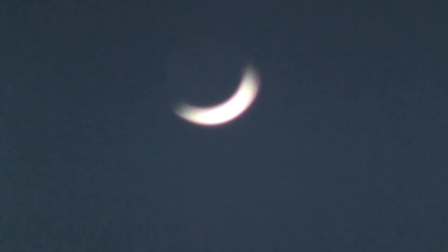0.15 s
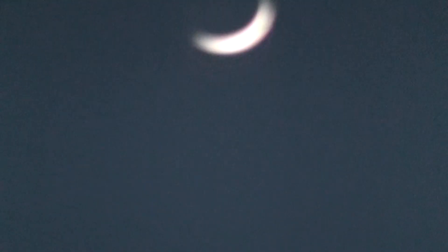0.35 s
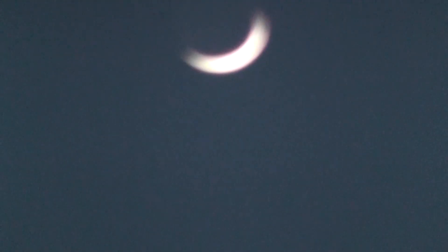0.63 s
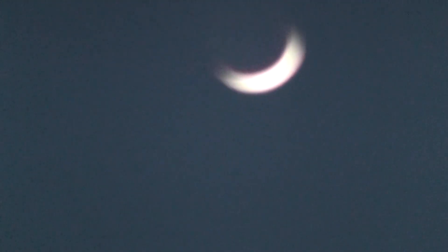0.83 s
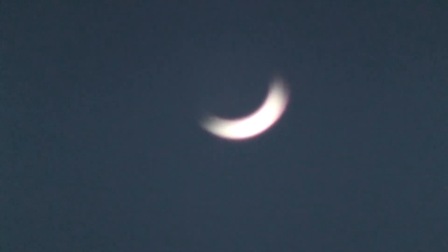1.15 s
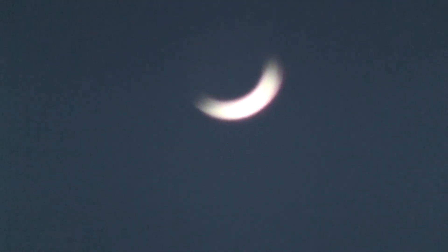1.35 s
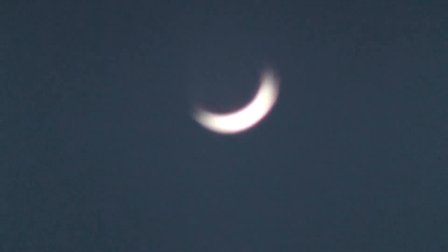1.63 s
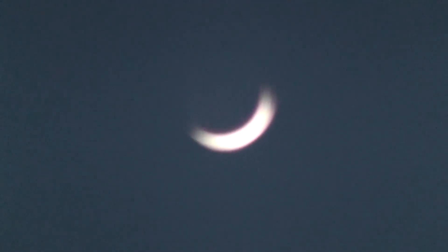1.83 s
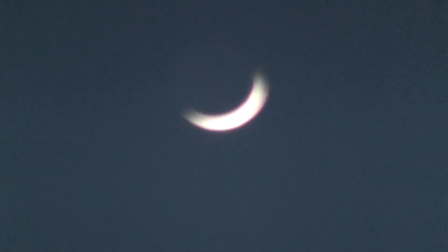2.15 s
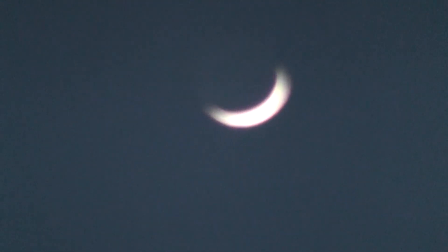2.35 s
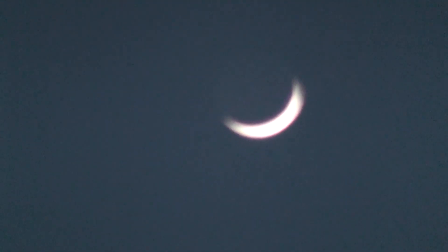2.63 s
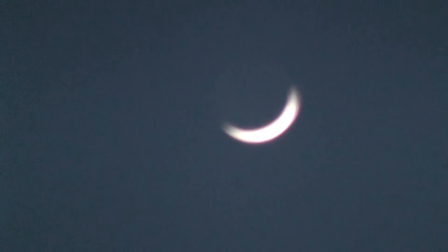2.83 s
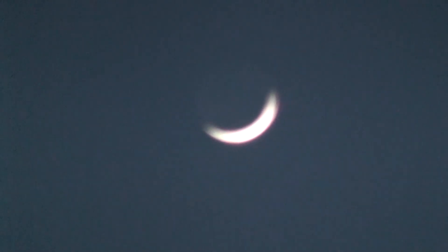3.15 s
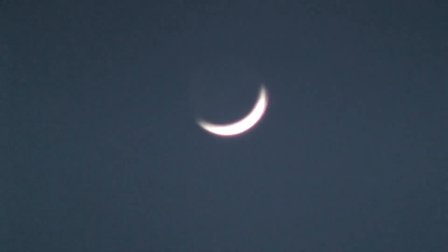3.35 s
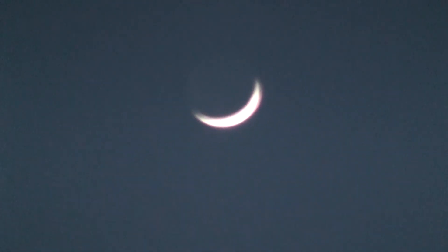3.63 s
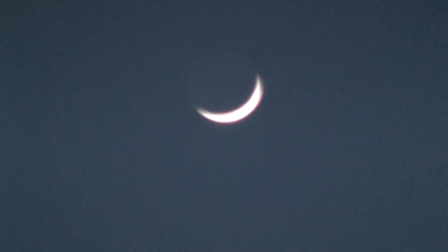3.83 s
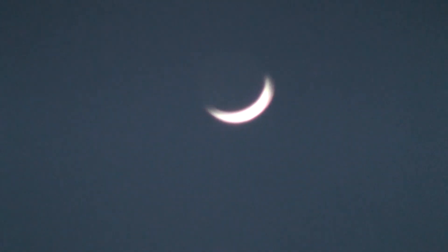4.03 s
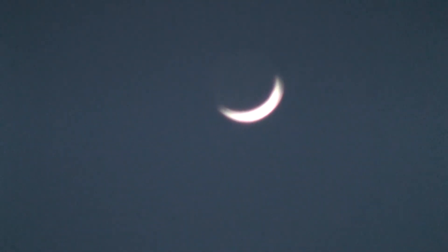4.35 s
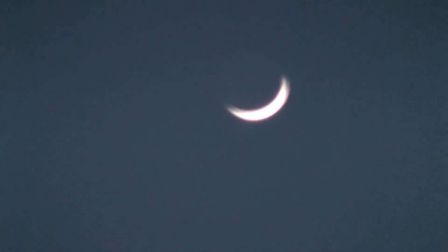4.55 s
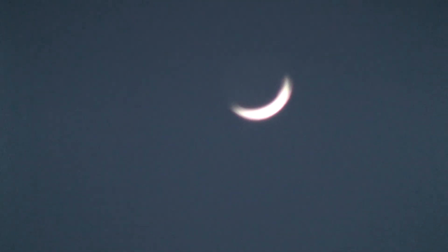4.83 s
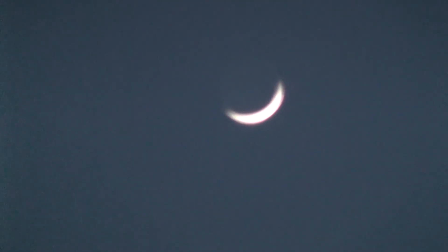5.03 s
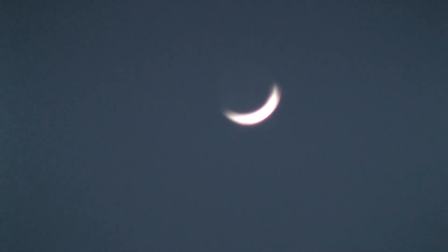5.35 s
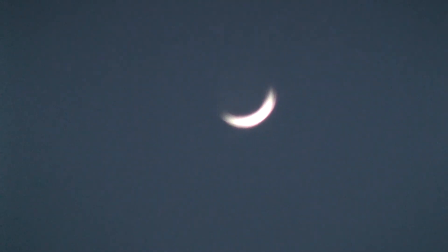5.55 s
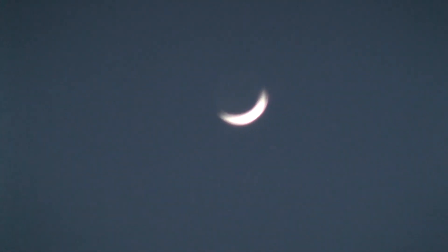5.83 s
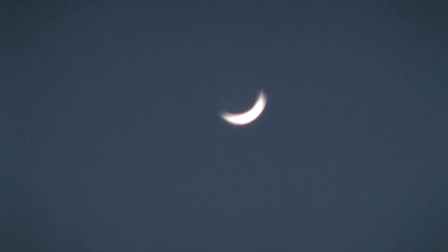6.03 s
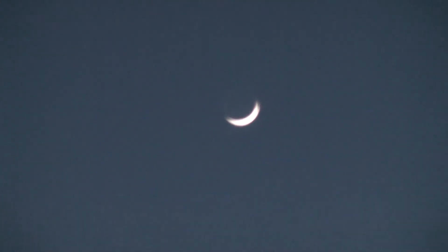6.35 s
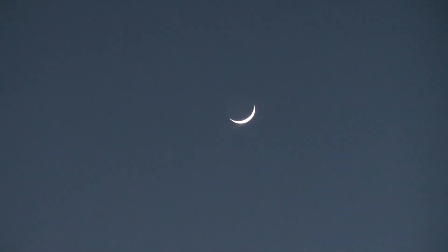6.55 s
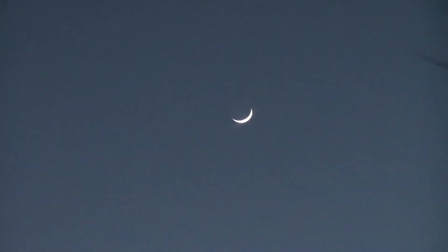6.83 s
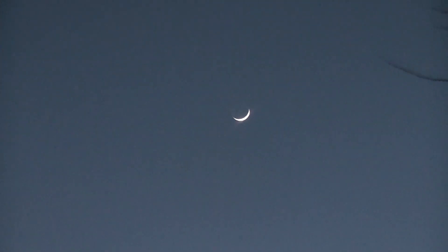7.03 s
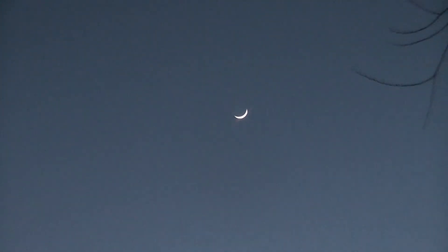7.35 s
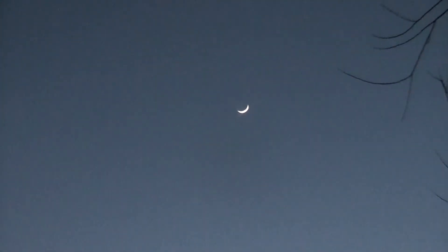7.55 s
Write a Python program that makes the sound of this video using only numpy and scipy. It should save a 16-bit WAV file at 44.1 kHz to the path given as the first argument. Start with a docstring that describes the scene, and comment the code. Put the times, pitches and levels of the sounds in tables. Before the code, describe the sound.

One blackbird, slightly left and in front of a stereo microphone, whistles rich falling notes, then single short chirped whistles with pauses, then a raspy buzz and squeaky high chips. Two last tiny chips come after a gap. The garden adds diffuse reverberation. Behind are low steady traffic, soft hiss, a blurred distant bird and very faint ticking.

```python
"""Slurred whistles are heard first: a blackbird sings one strophe, then arched and hooked notes, a buzz, a high twitter.
Each whistle is a gliding sine whose loudness depends on pitch, with weak overtones and noisy rasp added.
Walls and trees answer as decaying noise echoes with a gradual build-up.
Behind it, filtered noise makes distant traffic, a hiss, faint ticking and, late on, a lens zoom motor.
A far bird, made of unsteady sines, arrives blurred by echoes."""
import sys
import numpy as np
from scipy import signal
from scipy.fft import rfft, irfft, next_fast_len
from scipy.io import wavfile
from scipy.ndimage import map_coordinates

SR = 44100
rng = np.random.default_rng(int(sys.argv[2]) if len(sys.argv) > 2 else 0)


def store_pcm(level_fs):
    """Save levels as 16-bit WAV."""
    pcm = np.round(np.clip(level_fs, -1, 1) * 32767).astype(np.int16)
    wavfile.write(sys.argv[1], SR, np.atleast_2d(pcm).T)


N = 339129  # length in samples

# Overtones added in the windpipe: (harmonic number, level/dB before colouring)
OVERTONES = [(2, -54.5), (3, -70), (4, -70.5)]
# Colour the windpipe gives the overtones: (f/Hz, gain/dB)
WINDPIPE_COLOUR = [(4000, -12), (5000, 1.5), (5700, -5), (6400, -1), (7500, 5), (9200, -10.5), (10600, 1.5),
                   (12500, -8.5), (15000, -6)]


def blackbird(knee_db=-39, least_rasp_db=-36):
    """Nonlinear source and filter: both voices share one windpipe, which adds overtones; noise modulation rasps."""
    song, rough = slurs() + arches() + hooks() + chips() + buzzes()
    wave = signal.hilbert(song, next_fast_len(N))[:N]
    loudness, phase = np.abs(wave), np.angle(wave)

    # The overtones level off early, so soft notes are reedy and loud ones pure.
    drive = loudness / (loudness + amp(knee_db)) * amp(2.9 * wobble(120, N))
    overtones = drive * sum(amp(db) * np.cos(round(k) * phase) for k, db in OVERTONES)
    overtones = filtered(overtones, lambda hz: amp(along(WINDPIPE_COLOUR, hz)))

    rasp_colour = [(300, 1.5), (2000, -10.5), (4000, -15.5), (6000, -29.5), (9000, -26), (13000, -36.5)]
    rasp = unit(filtered(rng.standard_normal(N), lambda hz: amp(along(rasp_colour, hz))))
    return song + (rough + amp(least_rasp_db) * song) * rasp + overtones


# Slurred whistles; a high bend keeps the pitch up until late in the fall. Levels precede the pitch gain:
# (t/s, attack/s, rise/s, fall/s, hold/s, start f/Hz, top f/Hz, end f/Hz, bend,
#  level/dB, fade/dB, upper voice level/dB re main, rasp level/dB re tone)
SLURS = [ (.002, 0.0037, 0.02, 0.052, 0.0027, 2770, 3120, 2700, 1.2, -50, 4, -25, -21),
         (0.152, 0.0034, .02, 0.035, 0.013, 2870, 3080, 2150, 2.7, -26, -3.5, -9, -11.5),
         (0.225, 0.0078, 0.0094, 0.058, 0.03, 3117, 3220, 2137, 1.5, -31, -1.5, -27, -10),
         (0.702, 0.025, 0.036, 0.088, 0.0036, 2776, 2818, 1780, 1.4, -26, -6, -13, -16),
         (1.164, .007, 0.016, .092, 0.0021, 2690, 2720, 1790, 1.8, -26.5, -3.5, -13, -20.5),
         (4.549, 0.0058, .02, 0.043, 0.031, 2830, 2870, 2110, 7, -28, -3.5, -23, -19),
         (4.765, .014, 0.034, .053, 0.0024, 2875, 2920, 2260, 3.3, -23, -6.5, -40, -31), ]
SPLIT_RATIO, SPLIT_S = 1.5, 0.027  # upper voice a fifth above; time it and the rasp take to grow


def slurs(release_s=0.0045):
    """Two-voice phonation: whistles split past their top and roughen as they slide down."""
    out = 0
    for (s, attack, rise, fall, hold, start, top, end, bend,
         db, fade_db, upper_db, rasp_db) in SLURS:
        t, _ = clock(rise + fall + hold)
        falling = np.clip((t - rise) / fall, 0, 1)
        hz = arc(t, rise, start, top, end, falling ** bend)
        gain = amp(db + fade_db * falling ** 2) * envelope(t, attack, release_s)
        split = np.clip((t - rise) / SPLIT_S, 0, 1) ** 2
        out = out + sung(s, hz, gain, split * amp(rasp_db))
        out = out + sung(s, SPLIT_RATIO * hz, gain * split * amp(upper_db))
    return out


# Quick arched notes: (t/s, top f/Hz, length/s, level/dB before the pitch gain)
ARCHES = [(1.610, 3258, .058, -26.5), (2.092, 3295, 0.05, -25), (2.442, 3153, .059, -26),
          (2.779, 3266, 0.056, -27)]


def arches(top_at=.61, start_ratio=0.55, end_ratio=0.58, rise_bend=2.0, fall_bend=1.76):
    """Frequency modulation: one quick sweep up and down, sung four times."""
    out = 0
    for s, top, length, db in ARCHES:
        t, u = clock(length)
        before_top = np.clip(1 - u / top_at, 0, 1)
        after_top = np.clip((u - top_at) / (1 - top_at), 0, 1)
        below = (1 - start_ratio) * before_top ** rise_bend + (1 - end_ratio) * after_top ** fall_bend
        gain = amp(db) * envelope(t, attack_s=0.011, release_s=0.0035)
        out = out + sung(s, top * (1 - below), gain)
    return out


# Hooked notes: (t/s, top f/Hz, length/s, level/dB before the pitch gain)
HOOKS = [(3.170, 3102, 0.094, -27.5), (3.548, 3080, 0.1, -27.5), (3.846, 3099, .113, -28.5)]


def hooks(lead_share=.35, start_ratio=.88, end_ratio=0.6, sag=0.012, bend=9, drop_db=-9, edge_s=0.0015):
    """Pitch leap: a low lead-in jumps to a nearly level whistle, which drops at the very end."""
    lead_ratios = np.array((.69, .83, .775))  # start, top and end over the note's top pitch
    out = 0
    for s, top, length, db in HOOKS:
        t, u = clock(length * lead_share)
        lead_hz = arc(t, .018, *(top * lead_ratios), u ** 2)
        out = out + sung(s, lead_hz, amp(db) * envelope(t, 0.0054, edge_s))

        t, u = clock(length * (1 - lead_share))
        hz = arc(t, 0.0085, top * start_ratio, top, top * end_ratio, u ** bend) * (1 - sag * u ** 2)
        gain = amp(db + drop_db * u ** bend) * envelope(t, edge_s, edge_s)
        out = out + sung(s + length * lead_share, hz, gain)
    return out


# Sharp chips, plus a thin fading whistle at 5.794 and the faint low combination tone under it.
# Levels precede the pitch gain:
# (t/s, rise/s, fall/s, hold/s, start f/Hz, top f/Hz, end f/Hz, level/dB, fade/dB,
#  upper voice level/dB re main, rasp level/dB re tone before landing)
CHIPS = [ (4.515, 0.0023, 0.016, 0.017, 3260, 3444, 2780, -31.5, -4, -22, -13),
         (5.275, 0.016, 0.007, .011, 3080, 7200, 5050, -36, 8, -38, -15),
         (5.356, .013, 0.0097, 0.024, 4830, 7340, 6045, -32.5, 0.5, -37, -29),
         (5.534, .012, 0.0087, 0.068, 4920, 7060, 5667, -34.5, 0.5, -9.5, -15.5),
         (5.754, .008, 0.012, 0.01, 7140, 7260, 6630, -48, 13, -7, -24),
         (5.794, .045, 0.044, 0.021, 6590, 7050, 6740, -31, -28.5, -14.5, -23),
         (5.797, 0.072, 0.027, 0.0033, 4930, 5260, 5000, -61, -4, -35, -39),
         (7.076, 0.0061, 0.02, 0.0026, 6400, 7090, 6340, -31, -5, -42, -32),
         (7.28, 0.0072, 0.015, .004, 6300, 7510, 6360, -34.5, -2, -39, -30), ]
# Tiny pips that lead into a note, and a brief second harmonic above the 5.275 chip:
# (t/s, length/s, start f/Hz, end f/Hz, level/dB before the pitch gain)
PIPS = [(.214, 0.011, 2820, 2890, -25), (1.154, 0.014, 2560, 2700, -39), (4.509, 0.015, 2110, 2170, -39),
        (5.296, 0.015, 10000, 10150, -45), (7.062, 0.011, 5030, 5160, -38.5),
        (7.272, 0.007, 6230, 6140, -43)]
TWITTER_RATIO = 1.27  # in chips and buzzes, the pitch of the syrinx's other side over the main one


def chips(attack_s=0.0063, release_s=0.0013, pip_edge_s=0.0017, landed_rasp_db=-10):
    """Parallel voices: each tone rises, falls and clears of rasp under a weaker tone above; pips glide briefly."""
    out = 0
    for s, rise, fall, hold, start, top, end, db, fade_db, upper_db, rasp_db in CHIPS:
        t, u = clock(rise + fall + hold)
        fallen = np.sin(np.pi / 2 * np.clip((t - rise) / fall, 0, 1)) ** 2
        hz = arc(t, rise, start, top, end, fallen)
        gain = amp(db + fade_db * u) * envelope(t, attack_s, release_s)
        out = out + sung(s, hz, gain, amp(rasp_db + landed_rasp_db * fallen))
        out = out + sung(s, TWITTER_RATIO * hz, gain * amp(upper_db))
    for s, length, start, end, db in PIPS:
        t, u = clock(length)
        out = out + sung(s, start + (end - start) * u, amp(db) * envelope(t, pip_edge_s, pip_edge_s))
    return out


# Buzzes, whose pitch swings quickly; levels precede the pitch gain:
# (t/s, length/s, start f/Hz, end f/Hz, level/dB, swell/dB, swing f/Hz,
#  first swings per s, last swings per s, upper voice level/dB re main)
BUZZES = [(4.635, .143, 2400, 2874, -31.5, 4.5, 250, 190, 170, -42),
          (5.949, 0.16, 6770, 6850, -38.5, -5.5, 380, 120, 65, -13)]


def buzzes(settle_s=.03, uneven=0.12, edge_s=0.008, rasp_db=-33):
    """Fast vibrato: the pitch settles on its mark while it swings, a little unevenly, around it."""
    out = 0
    for s, length, start, end, db, swell_db, swing, first, last, upper_db in BUZZES:
        t, u = clock(length)
        rate = (first + (last - first) * u) * (1 + uneven * wobble(150, len(t)))
        vibrato = swing * np.sin(2 * np.pi * np.cumsum(rate) / SR)
        hz = end + (start - end) * np.exp(-t / settle_s) + vibrato
        gain = amp(db + swell_db * u) * envelope(t, edge_s, edge_s)
        out = out + sung(s, hz, gain, amp(rasp_db))
        out = out + sung(s, TWITTER_RATIO * hz, gain * amp(upper_db))
    return out


# Loudness that depends on pitch, with dips and peaks as from a ground reflection: (f/Hz, gain/dB)
PITCH_GAIN = [(1780, -22), (2000, -16), (2170, -5), (2450, -14), (2640, -7), (2820, -1.5), (3000, -1),
              (3250, -0.5), (3500, -9), (4100, -7.5), (5100, -3), (6100, 1.5), (9500, 0)]


def sung(s, hz, gain, rasp=0):
    """Comb-like interference weights a note by pitch; rows: the tone, and the part of it that rasps."""
    tone = note(s, hz, gain * amp(along(PITCH_GAIN, hz)))
    rasp_share = np.pad(rasp * np.ones(len(hz)), (int(max(s, 0) * SR), N))[:N]
    return np.array([tone, tone * rasp_share])


def note(s, hz, gain, jitter=0.0059, flutter_db=2.5):
    """Phase integration of one syrinx side: a gliding, slightly unsteady sine that starts at s."""
    hz = hz * (1 + jitter * wobble(500, len(hz)))
    level = np.sqrt(2) * gain * amp(flutter_db * wobble(183, len(hz)))  # gain is an rms value
    tone = level * np.sin(2 * np.pi * np.cumsum(hz) / SR)
    return np.pad(tone, (int(max(s, 0) * SR), N))[:N]


def arc(t, rise_s, start_hz, top_hz, end_hz, fallen):
    """Pitch glide: eases up to its top, then drops towards its end as fallen goes from 0 to 1."""
    still_to_rise = np.clip(1 - t / rise_s, 0, 1) ** 2
    return top_hz - (top_hz - start_hz) * still_to_rise - (top_hz - end_hz) * fallen


def clock(length_s):
    """Local time base: time within a note, and the same as a share of its length."""
    t = np.arange(int(length_s * SR)) / SR
    return t, t / t[-1]


def envelope(t, attack_s, release_s):
    """Amplitude shaping by squared sines: smooth attack, hold, smooth release."""
    edge = np.minimum(t / attack_s, (t[-1] - t) / release_s)
    return np.sin(np.pi / 2 * np.clip(edge, 0, 1)) ** 2


def garden(x, echoes, spread=0.2):
    """Diffuse reverberation: convolution with decaying stereo noise, rows (level/dB, t60/s, build-up/s, delay/s)."""
    tail = 0
    for db, t60, rise, delay in echoes:
        t = np.maximum(np.arange(SR) / SR - delay, 0)
        build_up = 1 - np.exp(-(t / rise) ** 2)
        tail = tail + amp(db) * unit(rng.standard_normal((2, SR)) * amp(-60 * t / t60) * build_up)
    mid, side = signal.fftconvolve(x[None], tail / np.sqrt(SR), axes=1)[:, :N]
    return np.array([mid + spread * side, mid - spread * side])


# A far bird's thin whistles: (t/s, length/s, start f/Hz, end f/Hz, level/dB before direct path and echoes)
FAR_WHISTLES = [(.575, 0.074, 3670, 3530, -57), (0.827, .12, 7500, 7850, -70), (2.22, .17, 4120, 4130, -60),
                (2.403, 0.028, 3800, 3960, -46), (2.536, .06, 4790, 4660, -52.5),
                (2.695, 0.062, 3840, 4010, -53.5)]
# Its trill: (t/s, length/s, centre f/Hz, level/dB before direct path and echoes, swing f/Hz, swings per s)
FAR_TRILL = (0.72, 2.2, 3819.5, -58.5, 295, 39)


def far_bird(direct_db=-7, edge_s=0.0096, trill_edge_s=0.1):
    """Weak direct sound plus reverberation: far wavering whistles and a trill arrive blurred by echoes."""
    s, length, hz, db, swing, rate = FAR_TRILL
    t, _ = clock(length)
    trill_hz = hz + swing * np.sin(2 * np.pi * rate * t)
    trill_gain = amp(db) * envelope(t, trill_edge_s, trill_edge_s)
    song = note(s, trill_hz, trill_gain, jitter=.02, flutter_db=2)
    for s, length, start, end, db in FAR_WHISTLES:
        t, u = clock(length)
        gain = amp(db) * envelope(t, edge_s, edge_s)
        song = song + note(s, start + (end - start) * u, gain, jitter=0.0072, flutter_db=3)
    return amp(direct_db) * song + garden(song, [(-8.5, 0.17, 0.0071, 0), (-11, 0.52, 0.016, 0)])


# Strength of the ticking before its pulse shape: (t/s, level/dB)
TICK_LEVEL = [(2.4, -100), (2.7, -69), (3.1, -62), (3.7, -59.5), (4.0, -64), (4.5, -100)]


def ticking(rate=19, scatter_s=0.021, width_s=0.0042):
    """Pulsed noise: faint, soft high ticks in a loose rhythm, rate of them a second."""
    t = np.arange(N) / SR
    beat = (t + scatter_s * wobble(rate, N)) * rate
    pulses = np.exp(-((beat % 1 - .5) / (rate * width_s)) ** 2) * amp(3.1 * wobble(rate, N))
    colour = [(4000, -37), (7000, -20.5), (8200, -3), (9600, -5.5), (10800, -19), (13000, -40)]
    return pulses * amp(curves(TICK_LEVEL)[0]) * rush(colour)


# Mean level of the lens motor: (t/s, level/dB)
MOTOR_LEVEL = [(5.7, -89), (6.2, -71), (7.69, -66)]
# Its resonances: (f/Hz, relative level/dB)
MOTOR_RESONANCES = [(6050, -3), (7300, 1.5), (9500, -3), (10800, -9)]


def lens_motor(width_hz=220):
    """Resonant filtering of noise: the zoom drive hisses faintly through a few peaks."""
    gears = lambda f: sum(amp(db) / (1 + ((f - hz) / width_hz) ** 2) for hz, db in MOTOR_RESONANCES)
    hiss = unit(filtered(rng.standard_normal(N), gears))
    return amp(curves(MOTOR_LEVEL)[0] + 1.3 * wobble(5, N)) * hiss


# Spectra of the traffic rumble, the tyres and the thin hiss: (f/Hz, relative level/dB per Hz)
RUMBLE = [(15, -44), (25, -64), (48, -5.5), (70, -1.5), (184, 0.5), (258, -0.5), (313, -4), (450, -11.5),
          (580, -31.5), (990, -120)]
TYRES = [(250, -19), (400, 0), (700, 1.5), (1000, -0.5), (1400, -5.5), (1800, -10.5), (2300, -20.5),
         (3200, -32.5), (6000, -53)]
HISS = [(1200, -27), (2200, 5.5), (3500, 3.5), (5000, -4.5), (7000, -8), (10000, -10), (15500, -14.5)]
# A car draws nearer, tyre noise before panning: (t/s, level/dB)
TYRE_LEVEL = [(0, -41.5), (3.8, -41.5), (5.5, -41), (7.69, -38)]
# Balance of the background: (f/Hz, L-R level/dB)
BACKGROUND_LEAN = [(60, -3.5), (200, -2.5), (400, 0), (800, 0.7), (2000, 0), (12000, 0.5)]


def background(rumble_db=-41, hiss_db=-59.5, waver_db=.5, waver_rate=5):
    """Broadband noise sources: distant traffic rumbles and slowly swells under a thin, steady hiss."""
    rumble = amp(rumble_db + waver_db * wobble(waver_rate, N)) * rush(RUMBLE)
    tyres = amp(curves(TYRE_LEVEL)[0]) * rush(TYRES)
    return placed(rumble + tyres + amp(hiss_db) * rush(HISS), BACKGROUND_LEAN)


# Likeness of left and right in the noises: (f/Hz, correlation)
ALIKE = [(60, 0.92), (200, 0.81), (500, 0.66), (1500, 0.6), (4000, 0.72), (12000, 0.65)]


def rush(spectrum):
    """Partial coherence: coloured stereo noise of rms 1, nearly mono in the bass."""
    turn = lambda hz: np.arccos(np.clip(along(ALIKE, hz), -1, 1)) / 2
    colour = lambda hz: amp(along(spectrum, hz)) * [np.cos(turn(hz)), np.sin(turn(hz))]
    mid, side = filtered(rng.standard_normal((2, N)), colour)
    return unit(np.array([mid + side, mid - side]))


def amp(db):
    """Decibel law: level to amplitude ratio."""
    return 10 ** (np.asarray(db) / 20)


def unit(x):
    """Normalisation to an rms of 1."""
    return x / np.sqrt(np.mean(x ** 2) + 1e-20)


def along(points, hz):
    """Interpolation of (f/Hz, value) points on a log axis."""
    f, v = np.transpose(points)
    return np.interp(np.log(hz + 1), np.log(f + 1), v)


def curves(rows):
    """Linear interpolation in time: one value per sample for each column after t/s."""
    s, *cols = np.transpose(rows)
    return [np.interp(np.arange(N) / SR, s, c) for c in cols]


def wobble(rate, size):
    """Band-limited fluctuation: a smooth random curve, rate knots a second."""
    return map_coordinates(rng.standard_normal(4096), [np.arange(size) * rate / SR], mode="mirror")


def filtered(x, response):
    """Linear filtering: the spectrum of x times a response of frequency."""
    m = next_fast_len(N + SR // 2)
    return irfft(rfft(x, m) * response(np.fft.rfftfreq(m, 1 / SR)), m)[..., :N]


def placed(x, lean):
    """Interchannel level difference: share a sound between channels by (f/Hz, L-R level/dB) points."""
    return filtered(x, lambda hz: amp(np.outer([.5, -.5], along(lean, hz))))


# The bird turns its head: (t/s, echo level/dB, direct sound's L-R level/dB before overall balance)
FACING = [(0, -1.5, 7.5), (2.9, -1.5, 8), (3.15, 2, 5), (4.0, 0.5, 6.5), (4.5, -2.5, 8), (5.3, -1, 6.5),
          (7.3, -5.5, 4.5)]
# Ground and fence, a house wall, then trees and houses, then the street beyond:
# (level/dB before the facing, t60/s, build-up/s, delay/s)
ECHOES = [(-5.5, 0.1, .008, 0.0014), (-9.5, 0.13, .005, 0.028), (-12.5, 0.51, 0.04, 0.0084),
          (-15.5, 1.14, 0.065, 0.0074)]
# Colour of the sound that twigs scatter: (f/Hz, gain/dB)
TWIGS = [(2500, -9), (3500, 7), (5000, -11), (7000, 2.5), (15000, 0)]
# Phase between the two microphone ports: (f/Hz, left lead/rad)
BIRD_PHASE = [(2300, -0.092), (2850, -0.63), (3300, -0.3), (5000, 0)]
# Overall balance of the bird and its echoes: (f/Hz, L-R level/dB)
BIRD_LEAN = [(2000, 2), (3500, -2), (6000, -2), (12000, 3)]


def scene(direct_treble_db=-2):
    """Superposition: the blackbird among twigs, a little to the left, in front of everything else."""
    song = blackbird()
    echo_db, lean_db = curves(FACING)
    direct = filtered(song, lambda hz: amp(along([(3500, 0.0022), (6000, direct_treble_db)], hz)))
    direct = direct * amp(np.outer([.5, -.5], lean_db))

    # Twigs around the perch smear the notes over some tens of milliseconds.
    twig_song = filtered(song, lambda hz: amp(along(TWIGS, hz)))
    scattered = garden(twig_song, [(-4, 0.055, 0.0019, 0.0031)])
    echoes = garden(song * amp(echo_db), ECHOES, spread=0.21)

    phase = lambda hz: np.exp(1j * np.outer([.5, -.5], along(BIRD_PHASE, hz)))
    bird = placed(filtered(direct + scattered + echoes, phase), BIRD_LEAN)
    return bird + far_bird() + background() + ticking() + lens_motor()


def record(dry, top_hz=15870):
    """Band limitation: nothing is kept at or above top_hz."""
    return filtered(dry, lambda hz: hz < top_hz)


dry = scene()
out = record(dry)
store_pcm(out)
```